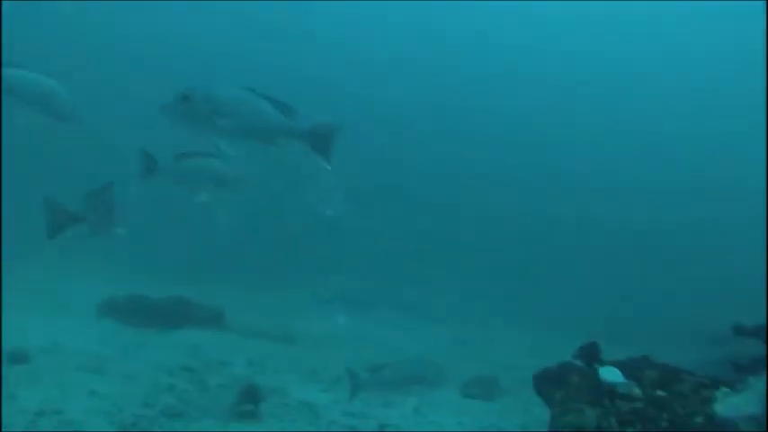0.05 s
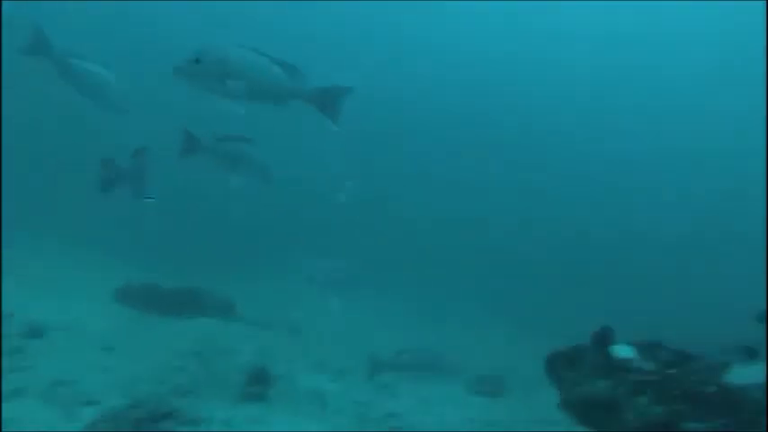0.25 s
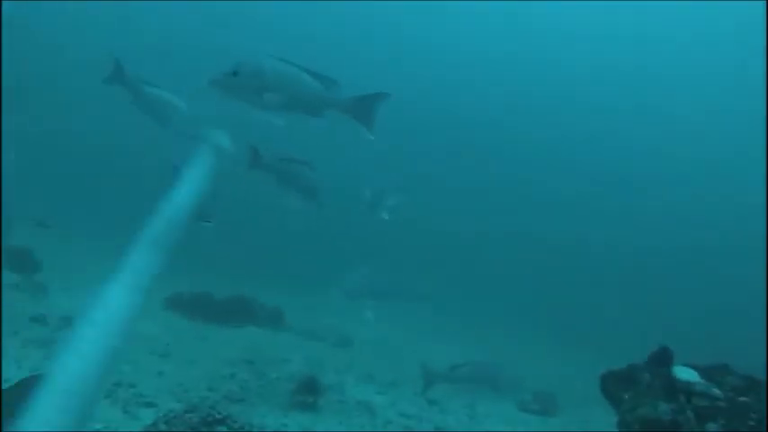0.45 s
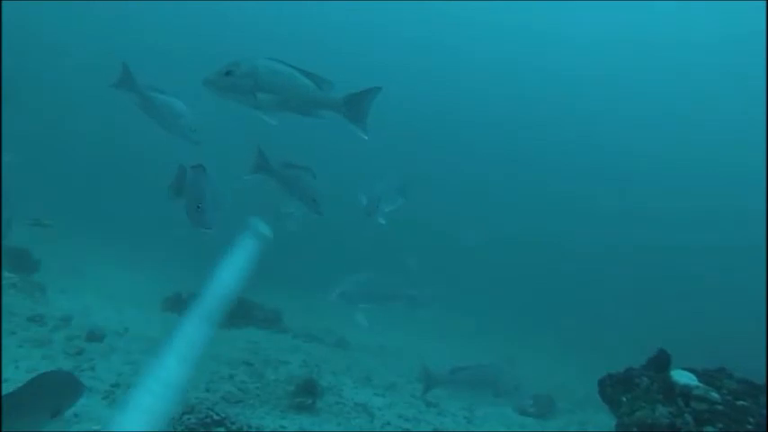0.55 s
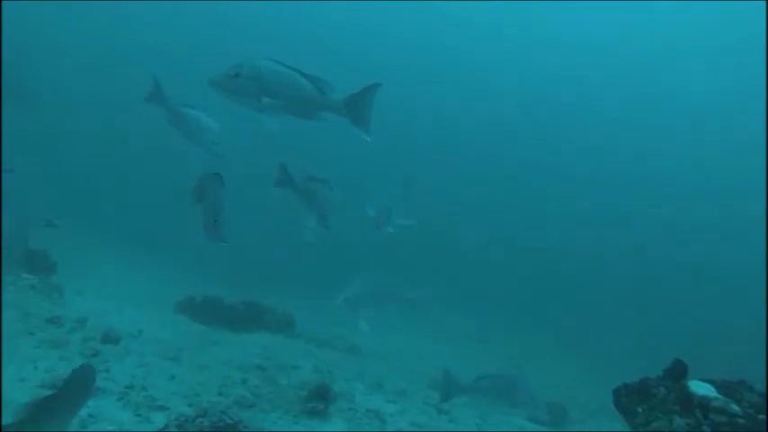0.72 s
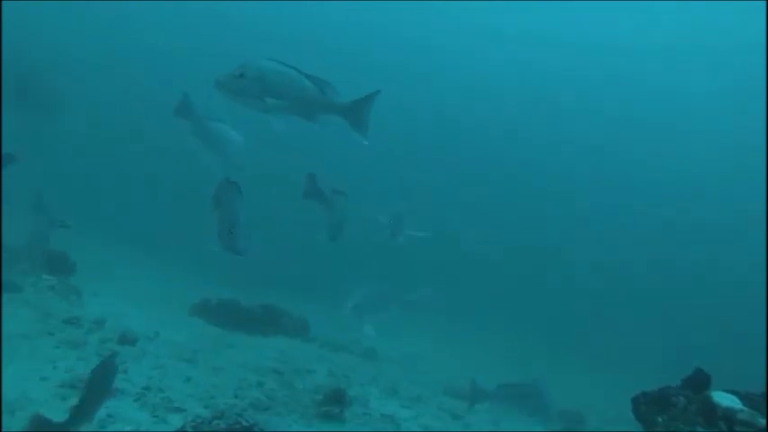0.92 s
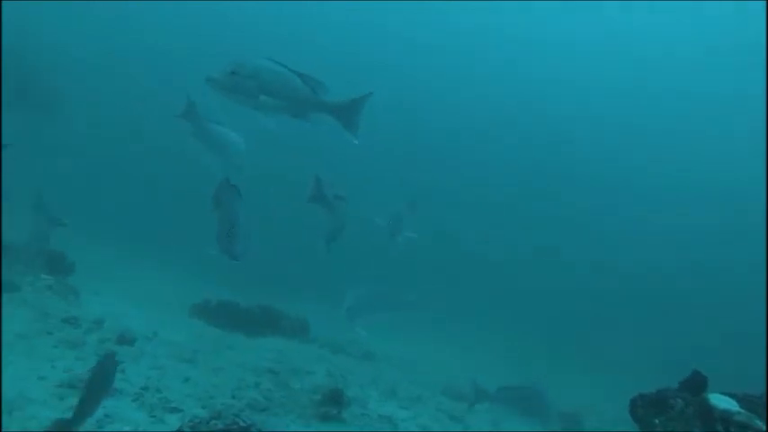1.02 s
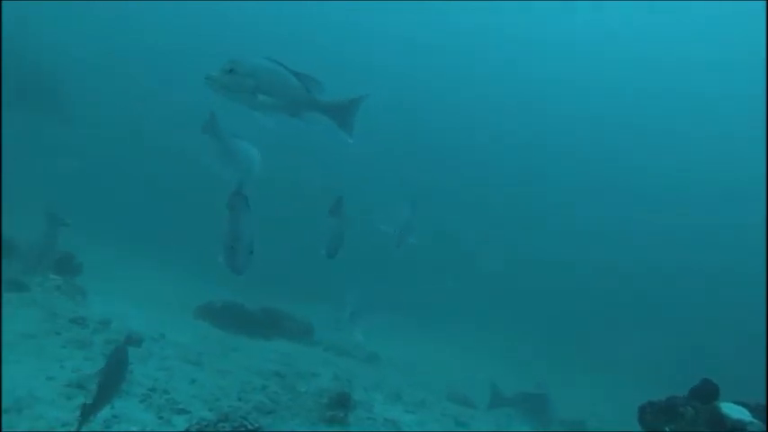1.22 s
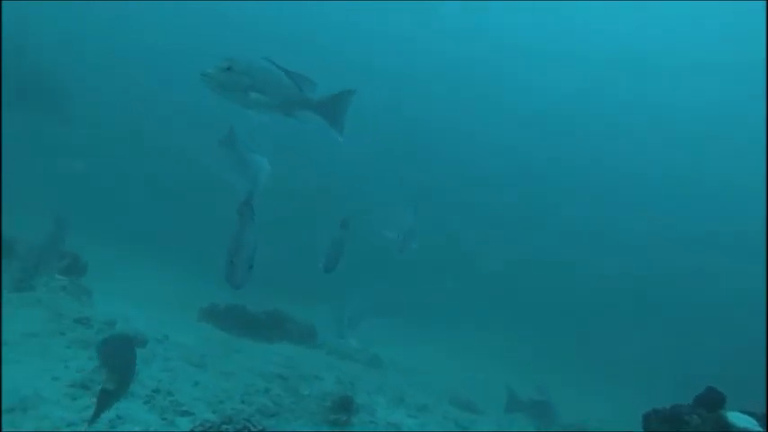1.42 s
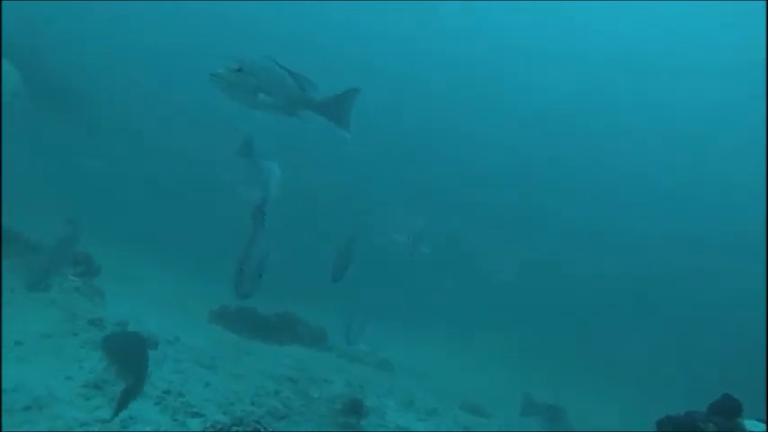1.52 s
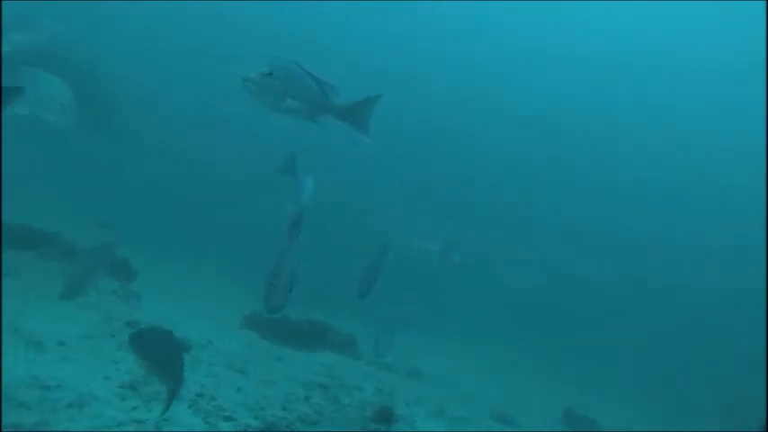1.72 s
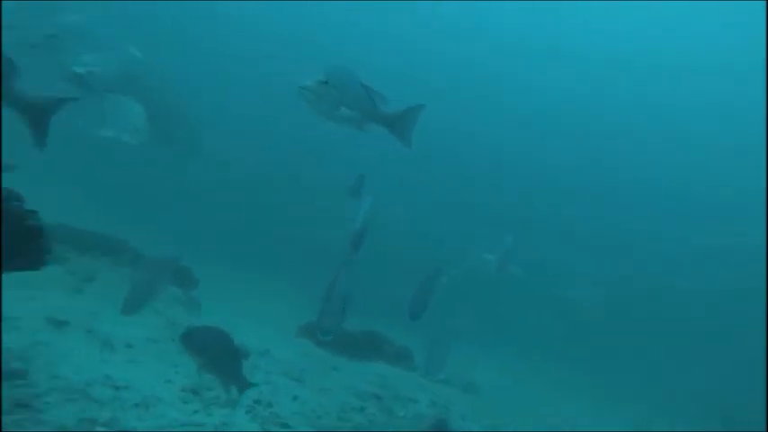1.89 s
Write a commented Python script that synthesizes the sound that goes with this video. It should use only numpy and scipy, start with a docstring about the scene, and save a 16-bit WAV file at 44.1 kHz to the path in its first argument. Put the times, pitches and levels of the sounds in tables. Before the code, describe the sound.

Underwater speargun shot: a faint click, one loud clack, then light taps dying away.

```python
"""Speargun fired under water

Heard through a camera housing, the trigger gives a faint, dull knock. The shaft strikes and scrapes
the barrel on its way out; water damps each ring within a few cycles. Bubbles collapse in sharp snaps,
the gun recoils and its rubber bands shudder. The line runs out with ever fainter taps and ticks,
over the soft rush of a quiet sea and the crackle of snapping shrimp."""
import sys
import numpy as np
from scipy.fft import rfft, irfft, next_fast_len
from scipy.io import wavfile
from scipy.ndimage import uniform_filter1d, minimum_filter1d, map_coordinates

SR = 44100
rng = np.random.default_rng(int(sys.argv[2]) if len(sys.argv) > 2 else 0)


def waveform_to_disk(signal):
    """Save audio, clipped to [-1, 1], as 16-bit WAV at the path in sys.argv[1]."""
    frames = np.transpose(np.atleast_2d(signal))
    scaled = np.clip(frames, -1, 1) * 32767
    samples = np.round(scaled).astype(np.int16)
    wavfile.write(sys.argv[1], SR, samples)


N = 85995

# spectrum of the sea's rush (frequency [Hz], gain [dB])
SEA_SPECTRUM = [(10, -8), (25, -3.5), (45, 2.5), (80, -5), (120, -3), (160, -4), (240, -5.5), (400, -8),
                (1230, -13.5), (2270, -15), (3200, -18.5), (6000, -25), (12400, -33), (15500, -37)]
# spectrum of a swirl past the housing (frequency [Hz], gain [dB])
SWIRL_SPECTRUM = [(15, -7), (50, 4), (100, -11), (170, 4.5), (400, -14), (750, -36), (1050, -5),
                  (1600, -13), (2300, -18), (4000, -33), (15000, -45)]
# spectrum of all snaps (frequency [Hz], gain [dB])
SNAP_SPECTRUM = [(500, -25.5), (2200, -10), (4500, -6), (7000, -1), (9500, -2), (13000, -6), (15500, -12)]
# spectrum of churned water (frequency [Hz], gain [dB])
WAKE_SPECTRUM = [(100, -1), (250, 0), (350, -6), (500, 0), (800, -7.5), (1100, -2), (1600, -9.5),
                 (3000, -17.5), (5400, -34.5), (15000, -50.5)]
# spectrum of the swaying gun (frequency [Hz], gain [dB])
SWAY_SPECTRUM = [(10, -13), (25, -5), (43, 2.5), (70, -12.5), (150, -15), (400, -46.5), (2000, -88.5)]
# spectrum of the rubbing line (frequency [Hz], gain [dB])
LINE_SPECTRUM = [(100, -25), (500, -12), (1200, -8.5), (1700, -3), (2300, 0), (2650, -4.5), (3000, -15),
                 (4300, -16), (5300, -35), (15000, -55.5)]
# response of the housing to rattles (frequency [Hz], gain [dB])
HOUSING_SPECTRUM = [(100, -30), (400, -16.5), (650, -7), (850, -6.5), (1250, -1), (1700, -1.5), (2350, 0.5),
                    (3000, -8.5), (3500, -12.5), (4400, -15.5), (5300, -33.5), (8000, -49.5),
                    (15000, -53.5)]
# spectrum of cracks, scrape and sizzle (frequency [Hz], gain [dB])
CRACK_SPECTRUM = [(500, -23), (2000, -5), (4300, 9.5), (5400, -3), (7000, -3), (10000, -16), (14000, -26),
                  (16000, -27)]
# spectrum of fizzing bubbles (frequency [Hz], gain [dB])
FIZZ_SPECTRUM = [(1000, -20), (2500, -6), (4100, 0), (5000, -6), (5600, -16.5), (9000, -23), (15000, -34)]
# how hard the line rubs (time [s], level [dB])
LINE_FRICTION = [(.25, -46), (.265, -39), (.295, -46), (0.311, -44.5), (.335, -52), (.356, -54.5),
                 (.373, -49.5), (.402, -61), (.422, -56), (0.438, -51.5), (0.451, -67), (.495, -62),
                 (.515, -61), (0.564, -51), (.58, -68), (.625, -73.5), (.665, -59.5), (.72, -71),
                 (.8, -100)]
# bumps of the gun in the hand (time [s], level [dB], frequency [Hz])
HAND_BUMPS = [(0.3023, -36, 930), (.312, -40, 617), (.343, -35.5, 1100), (.387, -41.5, 760),
              (0.392, -42.5, 510), (.4165, -42, 1030), (.4245, -40.5, 516), (1.547, -55, 1695),
              (1.622, -53, 1994), (1.709, -50, 1054), (1.847, -51.5, 1097)]
# bubbles collapsing after the shot, later nearby shrimp (time [s], level before filtering [dB])
NEAR_SNAPS = [(.2425, -18), (.2523, -15), (0.2565, -11), (.2777, -33), (.293, -41), (.617, -51),
              (1.238, -44.5), (1.439, -38), (1.832, -44)]
# modes of the trigger knock (frequency [Hz], level before filtering [dB], rise time [s])
TRIGGER_MODES = [(320, -35.5, 0.0027), (528, -17, .0015), (1205, -47, 0.0039), (1770, -27, 0.0015),
                 (1785, -51, 0.0081), (2850, -51, 0.0021)]
# modes of the gun and its bands (frequency [Hz], level [dB], 60 dB decay time [s])
RECOIL_MODES = [(44, -14.5, 0.081), (73, -29, 0.34), (149, -32.5, 0.32), (253, -36.5, 0.23)]
# housing modes beside a contact's main ring (frequency [Hz], relative level [dB], rise time [ratio])
HOUSING_MODES = [(690, -21, 1.1), (3052, -15, 0.76)]
# the line and its fittings tap the gun (time [s], level [dB], frequency [Hz])
LINE_TAPS = [(.27, -27, 2290), (0.2795, -23.5, 2280), (.3022, -36, 2130), (0.3422, -20.5, 1777),
             (0.346, -28.5, 1760), (.388, -33.5, 2110), (0.398, -40, 2260), (0.4157, -38, 2200),
             (.4329, -38.5, 2040), (.4659, -42, 2260), (0.4836, -34.5, 2330), (.5, -39.5, 2280),
             (0.5507, -31.5, 2290), (0.5848, -40, 2110), (0.6009, -36, 2225), (0.6562, -39, 2270),
             (.666, -44.5, 2290), (0.689, -48, 2144), (1.05, -56, 2200), (1.0572, -52.5, 2200),
             (1.0723, -44, 2156), (1.08, -51, 2284)]
# the shaft strikes the barrel
# (time [s], ring level [dB], frequency [Hz], rise time [s], rattle level [dB], crack level [dB])
SHAFT_STRIKES = [(0.23, -18, 2110, .0018, -29, -44), (.2321, -10, 2046, .001, -22.5, -38),
                 (0.2342, -5, 2453, .0022, -8.5, -40), (0.2409, -0.5, 2193, 0.0017, -20.5, -33),
                 (0.246, -5.5, 2074, .0009, -23, -36), (.2506, -4, 1384, 0.00085, -18.5, -23.5),
                 (.2558, -15, 2240, .0017, -27, -27)]

WAKE_START_S = .25  # the water churns and the line starts to run


def amp(db):
    return 10 ** (np.asarray(db) / 20)


def since(start_s):
    """Seconds elapsed after start_s, zero before it."""
    return np.maximum(np.arange(N) / SR - start_s, 0)


def decay(t, t60):
    """Exponential damping: a fall of 60 dB in t60 seconds."""
    return np.exp(-np.log(1000) * t / t60)


def pulse(centre_s, width_s):
    """A Gaussian pulse of unit height."""
    return np.exp(-((since(0) - centre_s) / width_s) ** 2)


def wobble(rate_hz):
    """Smooth random modulation through rate_hz knots a second."""
    knots = rng.standard_normal(int(N * rate_hz / SR) + 4)
    return map_coordinates(knots, [np.arange(N) * rate_hz / SR])


def impulses(per_s, top_db, spread_db):
    """A Poisson train of impulses, each up to spread_db below top_db."""
    return (rng.random(N) < per_s / SR) * amp(top_db - spread_db * rng.random(N))


def filtered(x, gain):
    """Zero-phase filtering: the spectrum of x is multiplied by gain(frequency)."""
    size = next_fast_len(N + SR // 4)
    return irfft(rfft(x, size) * gain(np.fft.rfftfreq(size, 1 / SR)), size)[:N]


def coloured(x, spectrum):
    """Spectral shaping by a gain table, interpolated in log frequency."""
    table_hz, db = np.transpose(spectrum)
    return filtered(x, lambda hz: amp(np.interp(np.log(hz + 1), np.log(table_hz), db)))


def noise(spectrum):
    """Coloured Gaussian noise of unit rms."""
    x = coloured(rng.standard_normal(N), spectrum)
    return x / x.std()


def ping(t, hz, rise_s):
    """A resonance damped by water: it peaks at rise_s and dies within a few cycles."""
    u = t / rise_s
    return (u * np.exp(1 - u)) ** 3 * np.sin(2 * np.pi * hz * t)


def sea():
    """Ambient noise: a soft rush, one swirl past the housing and the random snaps of distant shrimp."""
    rush = amp(-61 - .35 * wobble(12)) * noise(SEA_SPECTRUM)
    swirl = amp(-62.5 + 2.85 * wobble(35)) * pulse(1.79, width_s=.13) * noise(SWIRL_SPECTRUM)
    shrimp = coloured(impulses(per_s=66, top_db=-46.5, spread_db=12), SNAP_SPECTRUM)
    return rush + swirl + shrimp


def wake():
    """Turbulence decays behind the shaft, with friction noise from the line and a low sway of the gun."""
    t = since(WAKE_START_S)
    churn = amp(-43.5 + 3 * wobble(130)) * decay(t, t60=.6) * noise(WAKE_SPECTRUM)
    friction_db = np.interp(since(0), *np.transpose(LINE_FRICTION))
    rubbing = amp(friction_db + 2.5 * wobble(220)) * noise(LINE_SPECTRUM)
    sway = amp(-59.5) * decay(since(.707), t60=.45) * noise(SWAY_SPECTRUM)
    return (t > 0) * (churn + rubbing + sway)


def hand_bumps():
    """Soft impacts of the gun in the hand each excite one damped resonance."""
    return sum(amp(db) * ping(since(at_s), hz, rise_s=.0015) for at_s, db, hz in HAND_BUMPS)


def line_ticks():
    """Random, ever weaker impacts of the line on the gun are filtered by the housing."""
    t = since(WAKE_START_S)
    ticks = impulses(per_s=330, top_db=-20, spread_db=24) * (t > 0) * decay(t, t60=.66)
    return coloured(ticks, HOUSING_SPECTRUM)


def near_snaps():
    """Bubble collapse, from the shot or a shrimp, radiates a broadband burst of about a millisecond."""
    envelope = sum(amp(db) * (since(at_s) > 0) * decay(since(at_s), t60=.0039) for at_s, db in NEAR_SNAPS)
    return coloured(envelope * rng.uniform(-1, 1, N), SNAP_SPECTRUM)


def trigger(release_s=.0599, low_cut_hz=205):
    """Impulse excitation: the sear lets go and damped modes sum to a dull knock without deep bass."""
    modes = sum(amp(db) * ping(since(release_s), hz, rise_s) for hz, db, rise_s in TRIGGER_MODES)
    return filtered(modes, lambda hz: hz ** 2 / (hz ** 2 + low_cut_hz ** 2))


def recoil():
    """Reaction to the shot: a pressure pulse, then gun and bands vibrate freely until the hand damps them."""
    first_motion = amp(-22.5) * pulse(.2459, width_s=.001)
    push = amp(-9) * pulse(.251, width_s=.00063)
    t = since(.2525)
    swing = sum(amp(db) * decay(t, t60) * np.sin(2 * np.pi * hz * t) for hz, db, t60 in RECOIL_MODES)
    hand_damping = decay(since(.357), t60=.075)
    return first_motion + push - swing * hand_damping


def shaft_scrape(start_s=.2295, rise_s=.016, exit_s=.256):
    """Sliding friction sounds until the shaft leaves the muzzle; bubbles sizzle and fizz behind it."""
    after_exit = since(exit_s)
    sliding = np.minimum(since(start_s) / rise_s, 1) * decay(after_exit, t60=.014)
    sizzle = amp(-41) * decay(after_exit, t60=.085) * noise(CRACK_SPECTRUM)
    fizz = amp(-46.5) * decay(after_exit, t60=.074) * noise(FIZZ_SPECTRUM)
    friction = amp(-28.5) * sliding * noise(CRACK_SPECTRUM)
    return friction + (after_exit > 0) * (sizzle + fizz)


def impact(at_s, ring_db, hz, rise_s, rattle_db, crack_db, rattle_noise, crack_noise):
    """One contact excites the modes of the housing, with a short rattle and a bright crack."""
    start, t = round(at_s * SR), np.arange(SR // 10) / SR
    span = slice(start, start + len(t))
    side_modes = sum(amp(db) * ping(t, mode_hz, ratio * rise_s) for mode_hz, db, ratio in HOUSING_MODES)
    ring = amp(ring_db) * (ping(t, hz, rise_s) + side_modes)
    rattle = amp(rattle_db) * decay(t, t60=.025) * rattle_noise[span]
    crack = amp(crack_db) * decay(t, t60=.012) * crack_noise[span]
    attack = 1 - np.exp(-t / .0005)
    sound = np.zeros(N)
    sound[span] = ring + attack * (rattle + crack)
    return sound


def strikes_and_taps(tap_rise_s=.0013):
    """Impact sound: the shaft strikes the barrel hard, then the line taps the gun lightly."""
    noises = noise(HOUSING_SPECTRUM), noise(CRACK_SPECTRUM)
    strikes = sum(impact(*strike, *noises) for strike in SHAFT_STRIKES)
    taps = sum(impact(at_s, db, hz, tap_rise_s, db - 11.5, db - 38.5, *noises)
               for at_s, db, hz in LINE_TAPS)
    return strikes + taps


def scene():
    """Superposition: the pressures of all sources add at one microphone."""
    shot = trigger() + strikes_and_taps() + shaft_scrape() + recoil()
    return (shot + near_snaps() + hand_bumps() + line_ticks() + wake() + sea())[None]


def record(dry, ceiling=.98, cutoff_hz=15500):
    """Peak and band limiting: the camera briefly turns down the highest peaks and cuts the top treble."""
    needed_gain = np.minimum(1, ceiling / (np.abs(dry[0]) + 1e-9))
    smooth_gain = uniform_filter1d(minimum_filter1d(needed_gain, size=61), size=61)
    return filtered(dry[0] * smooth_gain, lambda hz: 1 / np.sqrt(1 + (hz / cutoff_hz) ** 120))[None]


dry = scene()
out = record(dry)
waveform_to_disk(out)
```